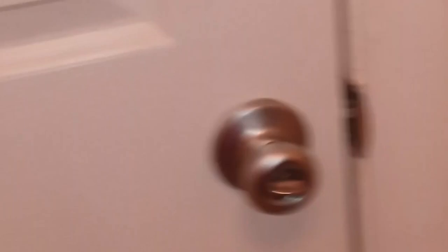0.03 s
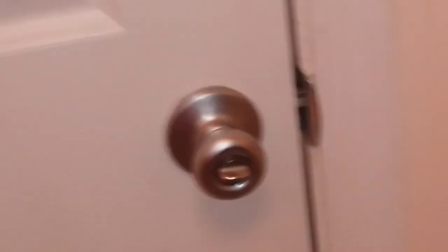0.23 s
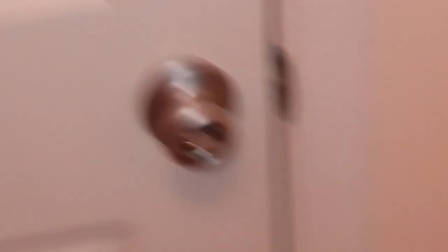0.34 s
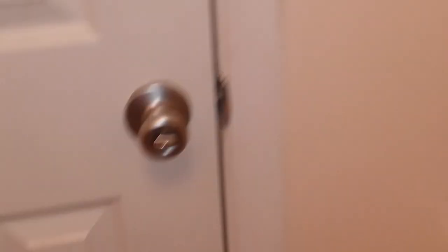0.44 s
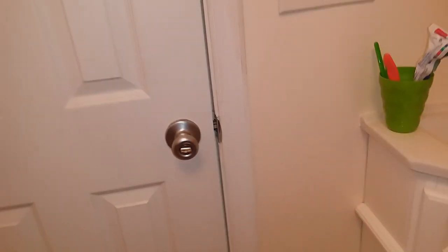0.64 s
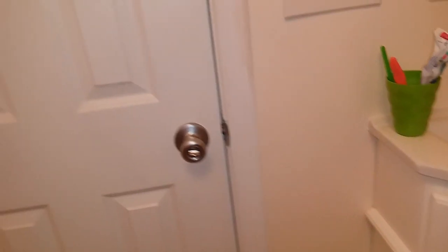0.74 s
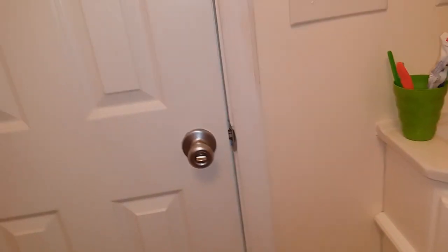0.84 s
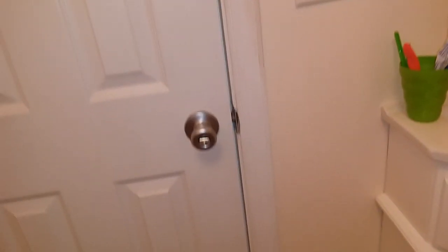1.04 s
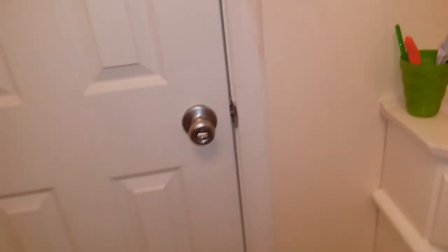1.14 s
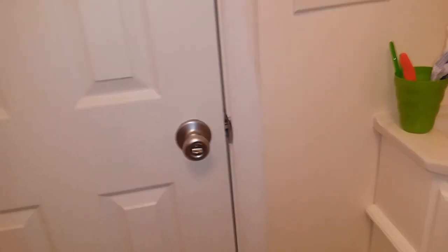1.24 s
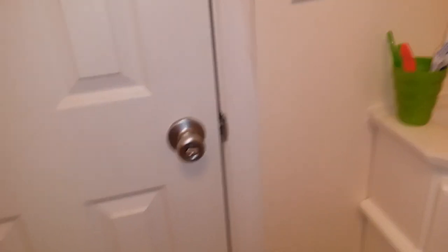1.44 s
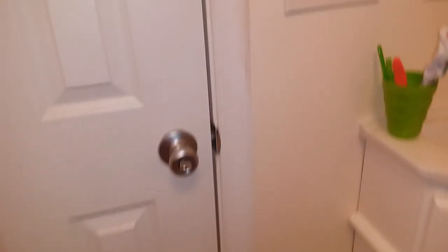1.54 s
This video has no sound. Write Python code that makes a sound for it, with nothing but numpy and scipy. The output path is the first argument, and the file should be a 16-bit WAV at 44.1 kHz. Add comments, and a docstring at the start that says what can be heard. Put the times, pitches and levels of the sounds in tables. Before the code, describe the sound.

Camera handling noise: irregular dry clicks, hollow knocks and soft rubbing over faint hiss.

```python
"""A soft rub and a sharp click, then more dry clicks, hollow knocks and dull thumps in a quiet room:
fingers are shifting their grip on a small hand-held camera. Joints in its plastic case slip and click,
and its body rocks in the hand with a thump, all carried straight to the microphone.
In between, skin slides over the case and makes it creak a little, above a faint hum and hiss."""
import sys
import numpy as np
from scipy import signal
from scipy.fft import rfft, irfft, next_fast_len
from scipy.io import wavfile
from scipy.ndimage import uniform_filter1d

SR = 44100
rng = np.random.default_rng(int(sys.argv[2]) if len(sys.argv) > 2 else 0)


def int16_out(signal):
    """Quantize to a 16-bit WAV file."""
    q = np.round(np.clip(np.atleast_2d(signal).T, -1, 1) * 32767)
    wavfile.write(sys.argv[1], SR, q.astype(np.int16))


N = 70560  # 1.6 s


def undb(db):
    """Turn decibels into a number to multiply by."""
    return 10 ** (np.asarray(db) / 20)


def unit(x):
    """Scale a sound so that its average (rms) level is 1."""
    return x / np.sqrt(np.mean(x ** 2))


def colour(x, points):
    """Turn low and high tones up or down along a curve of (f/Hz, level/dB) points."""
    size = 2 * next_fast_len(len(x))
    hz, db = np.array(points, float).T
    log_hz = np.log(np.maximum(np.fft.rfftfreq(size, 1 / SR), 1))
    gain = undb(np.interp(log_hz, np.log(hz), db))
    # arrange the filter so that nothing comes out before the sound goes in
    cepstrum = irfft(np.log(gain))
    cepstrum[1:size // 2] *= 2
    cepstrum[size // 2 + 1:] = 0
    return irfft(rfft(x, size) * np.exp(rfft(cepstrum)))[:len(x)]


def band(x, hz, q):
    """Keep the tones near hz; a higher q keeps a narrower band."""
    return signal.lfilter(*signal.iirpeak(hz, q, fs=SR), x)


def fade(t, t60):
    """Die away by 60 dB in t60 seconds, the fade time."""
    return np.exp(-np.log(1000) * t / t60)


def ring(t, modes):
    """The fading tones of a struck object; neighbouring tones swing opposite ways."""
    return sum((-1) ** k * undb(db) * fade(t, t60) * np.sin(2 * np.pi * hz * t)
               for k, (hz, db, t60) in enumerate(modes))


def add(out, start, x):
    """Mix x into out, beginning at start seconds."""
    i = int(start * SR)
    out[i:i + len(x)] += x[:len(out) - i]


def wander(rate_hz):
    """A smooth random wobble with a typical size of 1."""
    width = max(int(SR / rate_hz), 1)
    smoothed = uniform_filter1d(rng.standard_normal(N), width)
    return unit(uniform_filter1d(smoothed, width))


def room():
    """A faint steady hiss and the hum of mains electricity."""
    # tone curve of the hiss: f/Hz, level/dB
    hiss_curve = [(30, -34), (60, 13.5), (110, 2), (200, -3.5), (320, -9), (650, -14.5), (1400, -24.5),
                  (4000, -25), (7000, -26), (8700, -18), (10800, -25), (15000, -21.5), (16500, -25.5)]
    hum_hz, hum_db, hiss_db = 122.3, -70, -70
    hum = np.sqrt(2) * np.sin(2 * np.pi * hum_hz * np.arange(N) / SR)
    hiss = unit(colour(rng.standard_normal(N), hiss_curve))
    return undb(hiss_db) * hiss + undb(hum_db) * hum


def creaks():
    """A sliding finger briefly sets one tone of the case ringing."""
    # faint creaks: peak t/s, swell time/s, f/Hz, band width/Hz, level/dB
    rubs = [(0.334, 0.035, 2414, 350, -70), (0.475, 0.053, 1477, 170, -73.5),
            (0.712, 0.082, 307.4, 34.5, -67.5)]
    out, t = np.zeros(N), np.arange(N) / SR
    for peak, length, hz, width, db in rubs:
        q = hz / width
        tone = band(band(rng.standard_normal(N), hz, q), hz, q)
        swell = np.exp(-((t - peak) / length) ** 2)
        out += undb(db) * swell * unit(tone)
    return out


def skin_slides():
    """Skin drags over plastic: hiss, fine sizzle, low rumble and a thin squeak swell and die together."""
    # finger strokes: peak t/s, rise/s, fall/s, hiss/dB, sizzle/dB, rumble/dB, squeak/dB
    strokes = [(0.07, 0.024, 0.04, -69.5, -72.5, -56.5, -93), (.222, 0.035, 0.041, -59.5, -64, -47, -86),
               (.335, 0.084, 0.042, -61, -67.5, -57.5, -64),
               (.359, 0.016, 0.0058, -52.5, -55.5, -60, -53.5),
               (0.431, 0.024, 0.087, -70.5, -82, -63.5, -75), (0.523, 0.038, 0.089, -61.5, -68, -55, -68.5),
               (0.674, 0.01, 0.03, -62, -76, -62, -73), (0.891, 0.012, 0.045, -67, -80, -55, -77),
               (0.964, 0.025, 0.093, -73, -72.5, -72, -70), (1.081, 0.041, 0.018, -67.5, -75, -88, -66),
               (1.2, 0.02, 0.016, -58, -79, -43.5, -67), (1.245, 0.027, 0.059, -61, -69.5, -51, -68.5),
               (1.295, 0.0037, 0.01, -55, -68, -44.5, -58), (1.343, 0.034, 0.025, -77, -79, -52, -94),
               (1.58, 0.18, 0.17, -66, -102, -81, -76.5)]
    # tone curves of the rubbing: f/Hz, level/dB
    hiss_curve = [(300, -2.5), (900, -3), (1700, -9), (2400, -5), (4000, -2), (6000, -1.5), (8700, 5.5),
                  (10600, -15.5), (15500, -32)]
    sizzle_curve = [(5000, 0), (10500, -21.5), (13000, -1.5), (15300, -0.5), (16500, -12)]  # the finest grain of the skin
    rumble_curve = [(30, -29), (80, 7), (130, 2), (350, -6.5), (550, -8), (850, -19), (2000, -28.5),
                    (6000, -46)]
    grain_db, rough_grip_db = 4, 2.5
    squeak_hz, squeak_width_hz = 5710, 950
    t, powers = np.arange(N) / SR, 0
    for peak, rise, fall, *levels_db in strokes:
        swell = np.exp(-np.maximum((peak - t) / rise, (t - peak) / fall))
        powers = powers + np.outer(undb(levels_db) ** 2, swell ** 2)  # one row for each layer
    noise = rng.standard_normal((4, N))
    grain = undb(grain_db * rng.standard_normal(N) + rough_grip_db * wander(rate_hz=660))
    hiss = colour(noise[0] * grain, hiss_curve)
    sizzle = colour(noise[1] * grain, sizzle_curve)
    rumble = colour(noise[2], rumble_curve)
    q = squeak_hz / squeak_width_hz
    squeak = band(band(noise[3], squeak_hz, q), squeak_hz, q)
    layers = [hiss, sizzle, rumble, squeak]
    return sum(np.sqrt(power) * unit(layer) for power, layer in zip(powers, layers))


def thumps():
    """The camera rocks in the hand for a few swings, sinking in pitch as the grip relaxes."""
    # dull thumps as the grip gives: t/s, starting f/Hz, level/dB, fade time/s
    jolts = [(0.072, 99.6, -41, 0.077), (0.133, 250, -47, 0.1), (0.1849, 118.5, -19.5, 0.095),
             (0.215, 136, -53, 0.043), (.255, 89, -43, .12), (0.303, 355, -39.5, 0.03),
             (.502, 293, -30.5, 0.016), (0.528, 356, -35.5, 0.02), (0.531, 109, -40.5, 0.061),
             (0.573, 224, -35.5, 0.014), (0.646, 104, -55.5, 0.16), (.885, 103.6, -39, 0.11),
             (0.916, 205, -53, 0.047), (1.178, 268, -25.5, 0.031), (1.186, 147, -34, 0.053),
             (1.2053, 575, -22, 0.01), (1.211, 156, -32.5, 0.085), (1.226, 93, -54, 0.061),
             (1.2941, 417, -37, 0.062), (1.295, 187, -44.5, 0.11), (1.3186, 199, -26, .025),
             (1.3392, 212, -27, 0.022), (1.36, 177, -36, 0.054), (1.348, 97, -44.5, 0.16)]
    sag_share, sag_s, attack_cycles = 0.38, 0.077, 0.36
    out, t = np.zeros(N), np.arange(SR // 4) / SR
    for start, hz, db, t60 in jolts:
        pitch_hz = hz * (1 - sag_share * (1 - np.exp(-t / sag_s)))
        cycles = np.cumsum(pitch_hz) / SR
        attack = 1 - np.exp(-(cycles / attack_cycles) ** 2)
        add(out, start, undb(db) * fade(t, t60) * attack * np.sin(2 * np.pi * cycles))
    return out


def case_clicks():
    """A joint of the case slips: a crack, brief chatter, ringing plastic and a hollow knock."""
    # slips: t/s, snap level/dB, its lows and middle/dB, its top/dB, boosted f/Hz, knock level/dB
    slips = [(0.1118, -44, -5, 14, 8100, -82), (0.1815, -11, 1, 0.5, 7300, -16.5),
             (0.1999, -46, -16, 2, 8600, -30), (0.2037, -17, 8.5, 0, 4080, -17),
             (0.3949, -42, 2, 8, 7650, -70), (0.4303, -42, -5, -7, 6700, -64),
             (0.5019, -19.5, -2.5, -1, 6400, -41), (0.505, -33.5, 10, 3, 7860, -32.5),
             (0.5548, -27.5, -2, 17.5, 6500, -67), (.563, -37, 0, 7, 7050, -43.5),
             (0.5947, -40.5, -15, 9, 8000, -70), (0.8737, -23.5, 1, 5.5, 7100, -28),
             (0.8846, -25.5, 7, 3, 5200, -27), (1.0728, -38.5, -27, -14, 7560, -68),
             (1.1395, -43, 11.5, -10, 2750, -43.5), (1.165, -34.5, 4, 10, 8060, -47),
             (1.1685, -27.5, 0.5, -1, 8400, -77), (1.1747, -18.5, -6.5, 10.5, 6400, -36),
             (1.1776, -17.5, 3, 1, 6700, -51), (1.2022, -30.5, 6.5, 11, 8500, -24),
             (1.2057, -16, 6.5, 6, 8100, -27), (1.212, -23, -6.5, 10, 8400, -30),
             (1.3097, -21, -21, -2, 6500, -28.5), (1.327, -28.5, -4.5, 4, 6900, -61)]
    # tone curve of the crack: f/Hz, level/dB
    crack_curve = [(200, -31.5), (900, 3), (2000, -2.5), (4000, -3.5), (6500, 5.5), (8800, -3),
                   (10800, -11), (14500, -6.5), (17000, -14.5)]
    # ringing tones: f/Hz, level/dB, fade time/s
    plastic_tones = [(945, -29, 0.019), (1178, -27.5, 0.015), (2246, -27, 0.0094), (2987, -21.5, 0.0023),
                     (3670, -17, 0.0035), (5160, -19.5, 0.0043), (6090, -28, 0.0073), (7690, -10, 0.0018),
                     (8920, -15.5, 0.0033), (13850, -24.5, 0.0045)]
    knock_tones = [(439.4, -3, 0.02), (491, -8, 0.013), (297, -22.5, 0.025)]  # the whole hollow case
    ping_tones = [(2040, -0.5, 0.01), (3890, 1.5, 0.006)]  # one small part
    # firm presses that also ping the small part: t/s, level/dB
    pings = [(0.1824, -27.5), (0.8744, -40.5), (0.8831, -51)]
    crack_db, chatter_db, chatter_fade_s = -7.5, -18, 0.014
    bright_db, knock_attack_s = 4.5, 0.0014
    out, t = np.zeros(N), np.arange(SR // 16) / SR
    ringing = ring(t, plastic_tones)
    knock_attack = 1 - np.exp(-(t / knock_attack_s) ** 2)
    knock = knock_attack * sum(ring(t, [tone]) for tone in knock_tones)  # all swing the same way
    for start, db, middle_db, top_db, bright_hz, knock_db in slips:
        push = rng.standard_normal(len(t)) * undb(chatter_db) * fade(t, chatter_fade_s)
        push[0] += undb(crack_db)  # the crack is one sharp kick
        snap = colour(push, crack_curve) + ringing
        # each spot on the case has its own brightness
        snap = colour(snap, [(3500, middle_db), (6000, 0.017), (9500, 0.018), (13000, top_db)])
        snap = snap + undb(bright_db) * band(snap, bright_hz, q=9.2)
        add(out, start, undb(db) * snap - undb(knock_db) * knock)
    for start, db in pings:
        add(out, start, undb(db) * ring(t, ping_tones))
    return out


def scene():
    """Everything reaches the left and right microphone openings almost alike; they add a trace of noise."""
    # tone curves of what sets left and right apart: f/Hz, level/dB
    spread_curve = [(80, -59), (160, -51), (350, -27), (700, -24.5), (1500, -56), (5000, -51),
                    (12000, -28.5)]
    mic_noise_curve = [(40, -6), (300, 0.5), (1500, -15.5), (5000, -13.5), (9000, -8), (15000, -6)]
    centre = case_clicks() + thumps() + skin_slides() + creaks() + room()
    mic_noise = undb(-80.5) * unit(colour(rng.standard_normal(N), mic_noise_curve))
    side = colour(centre, spread_curve) + mic_noise
    return np.array([centre - side, centre + side])


def record(dry):
    """The sound opens after a moment of silence; the deepest bass and highest treble are cut."""
    start_s, fade_in_s = 0.068, 0.0008
    low_cut_hz, high_cut_hz = 59, 16300
    fade_in = np.clip((np.arange(N) / SR - start_s) / fade_in_s, 0, 1)
    bass_cut = signal.butter(2, low_cut_hz, "high", fs=SR, output="sos")
    treble_cut = signal.ellip(8, .2, 70, high_cut_hz, fs=SR, output="sos")
    return signal.sosfilt(treble_cut, signal.sosfilt(bass_cut, dry * fade_in))


dry = scene()
out = record(dry)
int16_out(out)
```